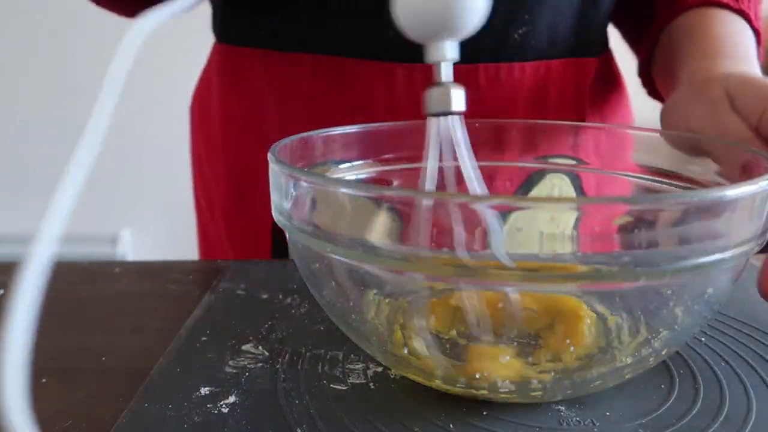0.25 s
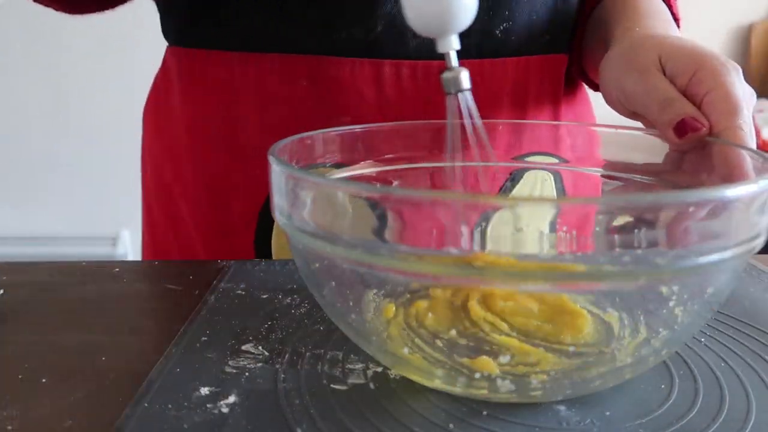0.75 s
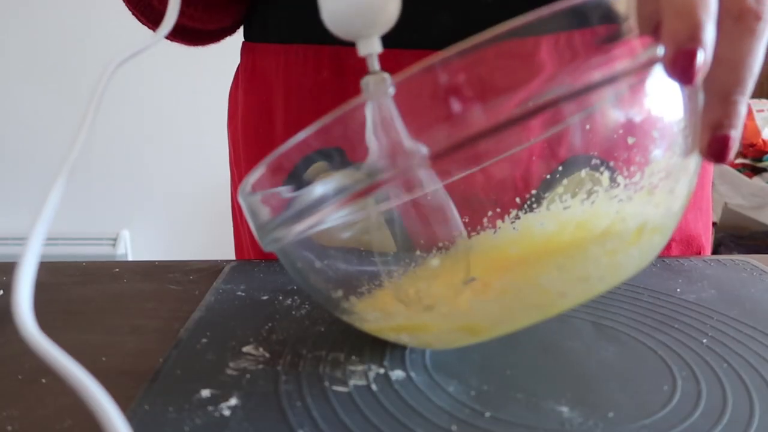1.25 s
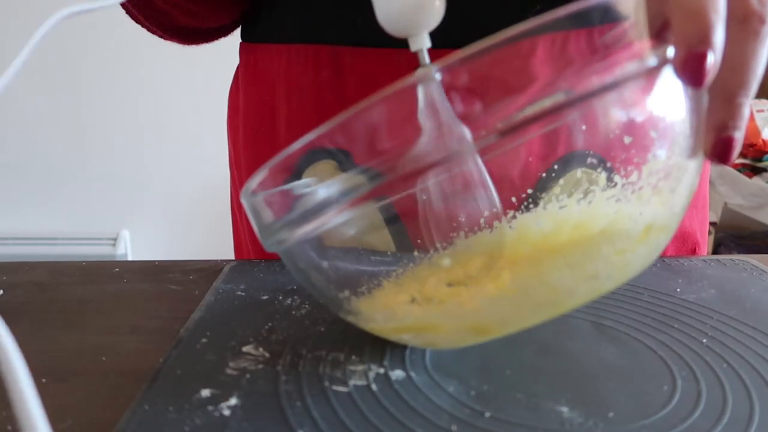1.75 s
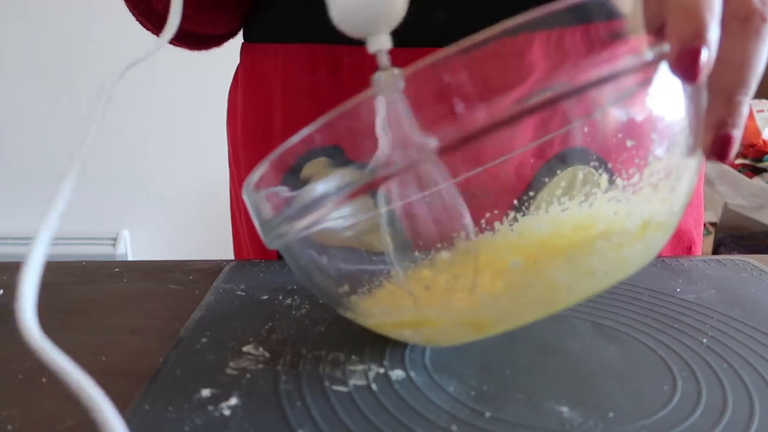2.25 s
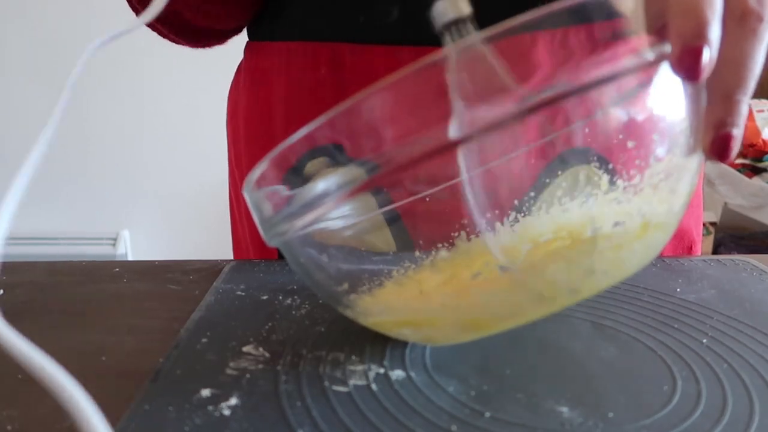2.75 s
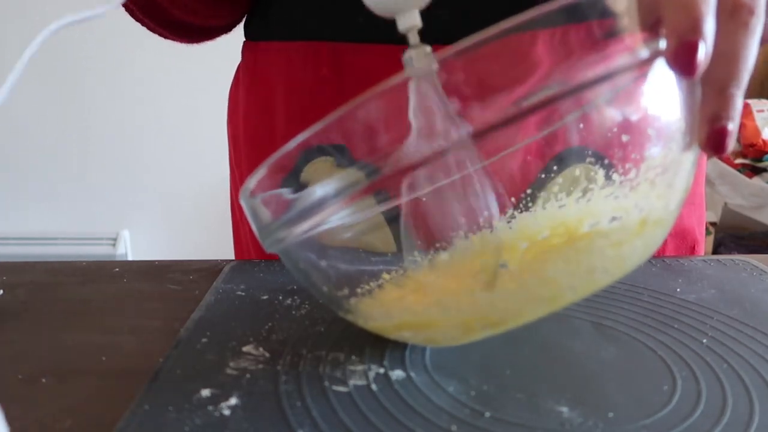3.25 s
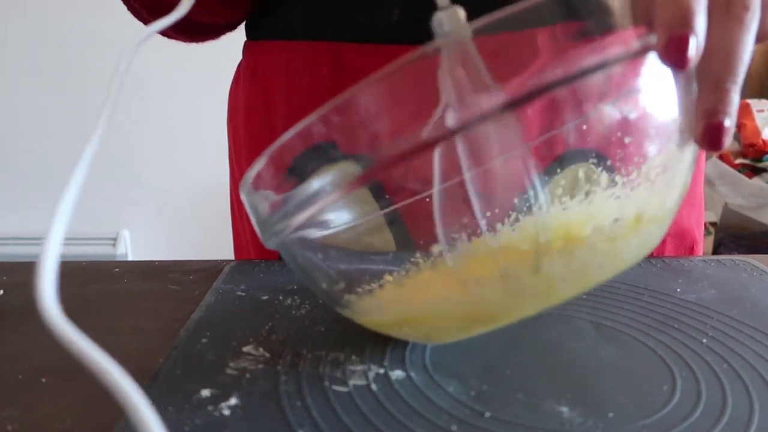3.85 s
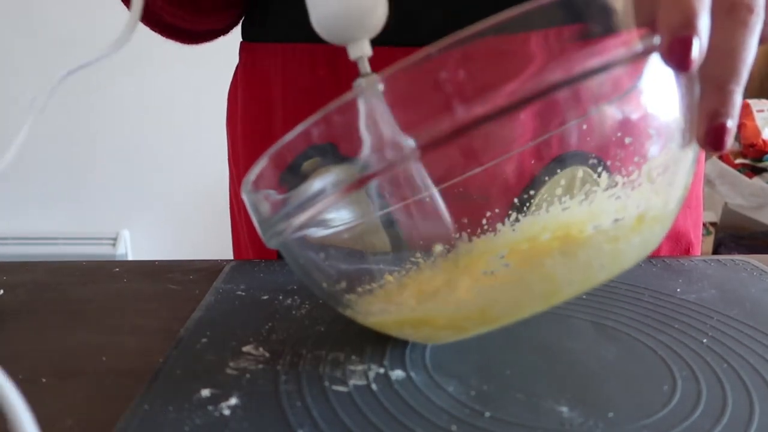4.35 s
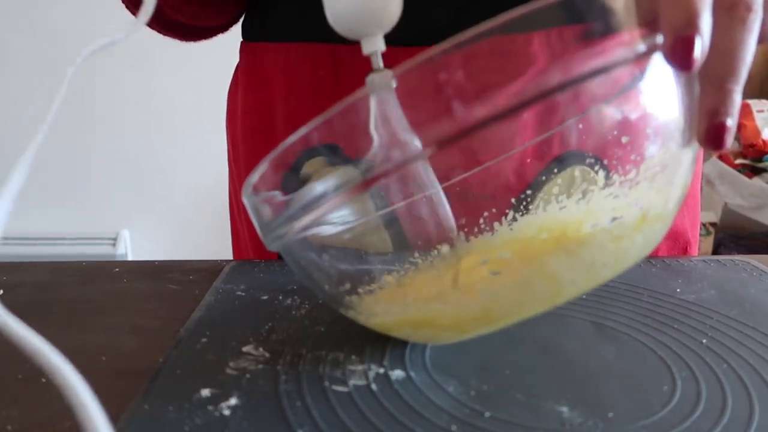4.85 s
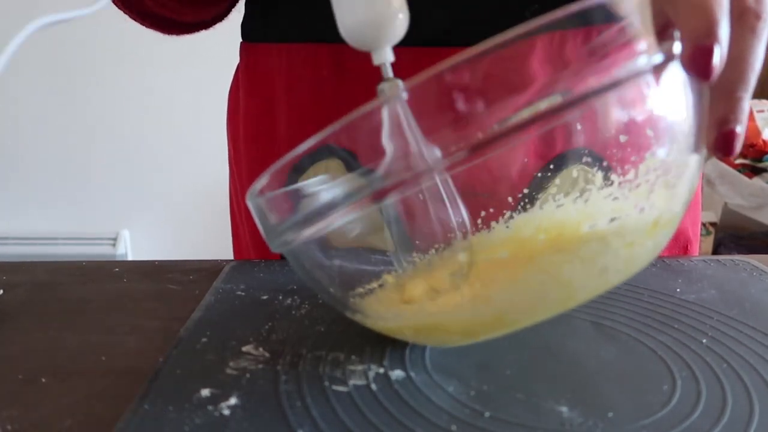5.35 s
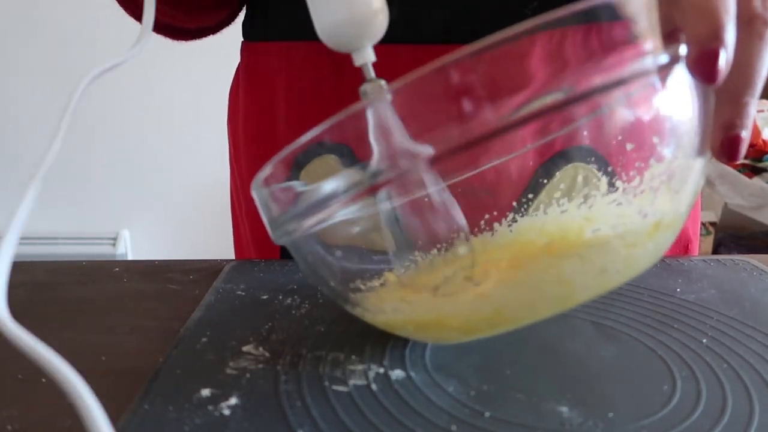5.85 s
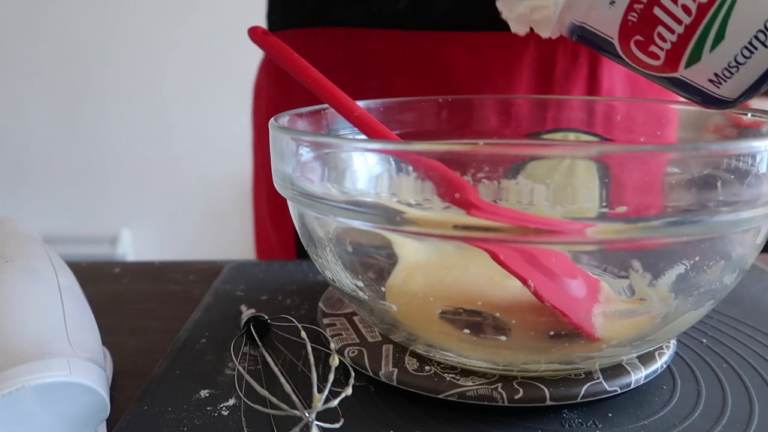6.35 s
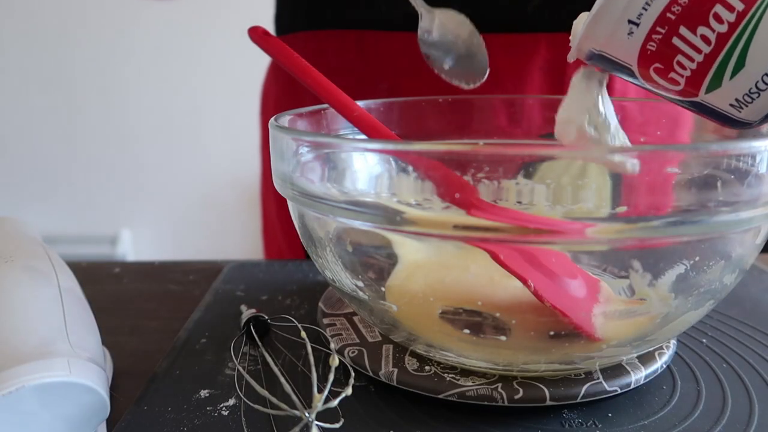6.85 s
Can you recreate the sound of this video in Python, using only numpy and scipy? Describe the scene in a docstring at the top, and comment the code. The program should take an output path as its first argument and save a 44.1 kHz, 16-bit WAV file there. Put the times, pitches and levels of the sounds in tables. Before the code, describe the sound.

Close in a kitchen, a whisk handled in a glass bowl gives light rustling, dull board knocks and one bright clink. A hard cut brings an electric whisk running continuously, wires buzzing and rattling fast on the glass over a thin gear whine, with sharp slaps and brief dips. It cuts off into quiet room air, low hum and a few tiny spoon ticks.

```python
"""A kitchen, heard close by a mid/side stereo microphone pair, in three joined moments.
A whisk is set into a glass bowl: rubbing contacts rustle, board modes thud, glass modes clink.
The electric whisk runs in the tilted bowl: gear and wire contacts drive housing, wires and bowl, over a
gear whine of sines and a low noise rumble. Then the quiet room is alone: coloured air, appliance hum
and a few small ticks of a spoon on a tub."""
import sys
import numpy as np
from scipy import signal
from scipy.fft import rfft, irfft
from scipy.io import wavfile
from scipy.ndimage import uniform_filter1d

SR = 44100
rng = np.random.default_rng(int(sys.argv[2]) if len(sys.argv) > 2 else 0)


def log_audio(samples):
    """Write samples as a 16-bit WAV file to the path given in sys.argv[1]."""
    # one column per channel
    frames = np.atleast_2d(samples).T
    # limit to full scale, then quantise
    limited = np.clip(frames, -1, 1)
    pcm = np.round(limited * 32767).astype(np.int16)
    wavfile.write(sys.argv[1], SR, pcm)


N = 313536
TIME_S = np.arange(N) / SR
START_S, STOP_S = .834, 5.991   # the whisk runs between these joins

# whine pitch of the gears: (time [s], pitch [Hz])
WHINE_PITCH = [(.83, 886), (1.5, 884), (2.6, 880), (3.2, 888), (4.4, 882), (5.2, 880), (5.6, 872), (6, 862)]
# slow changes of the running whisk, before lifts and flutter:
# (time [s], rattle level [dB], treble lift [dB], rumble level [dB])
WHISK_LEVELS = [(.84, -25.5, -2, -46), (.95, -26.5, -0.5, -44.5), (1.38, -26, -1.5, -44),
                (1.9, -27.5, -2, -48), (2.1, -26, -0.5, -45.5), (2.45, -27.5, -3.5, -45.5),
                (2.75, -27, 1, -45.5), (3.12, -27.5, -0.5, -42.5), (3.35, -25.5, 0.5, -47),
                (3.6, -30, 0.5, -47.5), (3.93, -28, 0, -42.5), (4.35, -25.5, -1.5, -48.5),
                (4.75, -27.5, -1.5, -46.5), (5.05, -24.5, -2, -45), (5.3, -26.5, -1, -46.5),
                (5.9, -25.5, -1.5, -47), (5.99, -28.5, -3.5, -55)]
LIFT_SMOOTH_S = 0.063   # treble and rumble follow the lifts smoothed over this time
LIFT_TREBLE, LIFT_RUMBLE = 0.48, 3.2   # treble gain and rumble loss, dB per dB of rattle loss


def whisk():
    """Motor rotation times the contacts, which drive the rattle, wires and bowl; returns mid and side."""
    phase = 2 * np.pi * np.cumsum(in_time(WHINE_PITCH)[0]) / SR
    rattle_db, treble_lift_db, rumble_db = in_time(WHISK_LEVELS)
    loss_db = lifted()
    eased_db = uniform_filter1d(loss_db, int(LIFT_SMOOTH_S * SR))
    contacts, crowding_db = gear_and_wire_contacts(phase)
    front = rattle(contacts, treble_lift_db + LIFT_TREBLE * eased_db)
    level = from_db(rattle_db - loss_db + 0.79 * drift(14.7))
    rings = bowl_rings(front, RING_CHATTER * crowding_db - loss_db)
    low_noise = rumble(contacts, rumble_db - LIFT_RUMBLE * eased_db)
    mid = level * (front + wire_song(contacts)) + slaps(front) + rings + whine(phase) + low_noise
    side = level * side_rattle(contacts) + from_db(-2) * band(rings, 2634, 2662)
    # 2 ms fades at the joins
    running = np.clip((TIME_S - START_S) / .002, 0, 1) * np.clip((STOP_S - TIME_S) / .002, 0, 1)
    return running * mid, running * side


TOOTH_DB, TOOTH_UNEVEN_DB = -19, 5   # tooth knocks against the other contacts, and their spread


def gear_and_wire_contacts(phase):
    """Contacts crowd once and twice a motor turn and once a whisk turn; one gear tooth knocks each motor turn."""
    motor, wires = phase / 4, phase / 22
    crowding_db = 2.5 * np.cos(motor) + 2.2 * np.cos(2 * motor)
    crowding_db += 1.9 * np.cos(wires + 1.5 * drift(1.5)) + .7 * drift(20)
    contacts = grains(5000 * from_db(crowding_db), spread_db=1.5)
    turns = np.diff(np.floor(motor / (2 * np.pi)), prepend=0)
    tooth = turns * from_db(rng.normal(0, TOOTH_UNEVEN_DB, N))
    return contacts + from_db(TOOTH_DB) * rms_one(tooth), crowding_db


# the wires ease off the glass, then bite again:
# (time of greatest loss [s], rattle loss [dB], easing [s], bite [s])
LIFTS = [(1.14, 2.5, 0.11, 0.0078), (1.3, 3.5, 0.069, 0.033), (1.407, 8.5, 0.011, 0.017),
         (1.926, 3.5, 0.021, 0.063), (2.0, 3, 0.011, 0.013), (2.0605, 8.5, 0.031, 0.0011),
         (2.259, 3, 0.059, 0.049), (2.425, 7, 0.018, 0.011), (2.859, 4, 0.038, 0.034),
         (2.975, 4, 0.036, 0.068), (3.25, 7.5, 0.025, 0.043), (4.022, 5, 0.044, 0.042),
         (4.15, 2, 0.053, .012), (4.355, 4.5, 0.02, 0.016), (4.64, 2.5, 0.011, 0.071),
         (4.85, 5, 0.026, 0.011), (5.01, 3.5, 0.066, 0.006), (5.326, 4, 0.018, 0.013)]


def lifted():
    """Loss in dB while the wires ease off the glass and bite again."""
    return sum(np.interp(TIME_S, [s - easing_s, s, s + bite_s], [0, loss_db, 0])
               for s, loss_db, easing_s, bite_s in LIFTS)


# resonances of the whisk housing: (pitch [Hz], width [Hz], level over the rattle [dB])
HOUSING = [(1216, 190, 4.5), (3220, 600, 6), (4650, 810, 8), (6100, 610, 4.5)]
# colour of the rattle in the mid microphone: (frequency [Hz], density [dB per Hz])
RATTLE_MID = [(350, -51.5), (600, -17), (678, -21.5), (706, -12.5), (866, -8), (953, -8), (1600, 2.5),
              (1860, 0.5), (2400, -0.5), (3710, -8), (4750, -9.5), (9630, -25.5), (11300, -53),
              (13000, -31.5), (15500, -43.5)]
# the rattle turns hollow around one pitch: (time [s], loss [dB], length [s])
HOLLOWS = [(4.8, 8, 0.078), (5.12, 14, 0.044), (5.452, 0.5, .15)]
HOLLOW_HZ, HOLLOW_WIDTH_HZ = 2630, 300


def rattle(contacts, treble_lift_db):
    """Contacts and reflections sound the housing, whose resonances swell and fade as the hand moves."""
    front = contacts + moving_reflect(contacts, t60=0.067, db=-8)
    front = front + sum((from_db(db + 1.05 * drift(0.74)) - 1) * resonate(front, hz, width)
                        for hz, width, db in HOUSING)
    front = colour(front, RATTLE_MID)
    front = front + (from_db(treble_lift_db) - 1) * band(front, 2450, 10800)
    hollow_db = sum(db * bell(s, length_s) for s, db, length_s in HOLLOWS)
    return front + (from_db(-hollow_db) - 1) * resonate(front, HOLLOW_HZ, HOLLOW_WIDTH_HZ)


# colour of the rattle in the side microphone: (frequency [Hz], density [dB per Hz])
RATTLE_SIDE = [(120, -59), (200, -45), (365, -12), (665, -15), (842, -24), (1150, -100), (1710, -5),
               (2700, 7.5), (3010, -1), (4330, 8), (11800, 1.5), (15500, -23)]


def side_rattle(contacts):
    """The side microphone gets moving reflections of the contacts mixed with noise."""
    reflected = moving_reflect(contacts, t60=0.15, db=0.0)
    return from_db(-15.0) * colour(reflected + .7 * rng.standard_normal(N), RATTLE_SIDE)


# whisk wires sing: (pitch [Hz], width [Hz], level against the rattle [dB])
WIRES = [(1110, 13, -24), (1225, 7.8, -27), (1304, 5.9, -42), (1522, 9.9, -27.5), (1640, 9.3, -26.5),
         (1770, 6.8, -36), (2220, 8.6, -39), (2410, 10, -29), (2900, 15, -30)]


def wire_song(contacts):
    """Contacts excite narrow wire resonances, each of wandering level."""
    return sum(from_db(db + 4.1 * drift(7.1)) * rms_one(resonate(contacts, hz, width))
               for hz, width, db in WIRES)


# the whisk passes the spots that sound each bowl mode, one list a mode: (time [s], level [dB], length [s])
RINGING = [
    [(.9, -37, 0.07), (1.17, -42, 0.083), (1.55, -39, 0.034), (2.15, -49, 0.085), (4.23, -38, 0.06),
     (4.8, -33.5, 0.051), (5.08, -37, 0.039), (5.6, -37, 0.11), (5.87, -30, 0.036)],
    [(1.0, -43, 0.26), (2.8, -37, 0.1), (3.1, -39, 0.17), (3.35, -38, 0.083), (3.61, -34, 0.062),
     (4.05, -35, 0.1), (4.5, -42, 0.15), (5.29, -35, 0.052)],
    [(1.1, -38, 0.097), (1.38, -40, .04), (1.75, -37, 0.054), (2.3, -41, 0.18), (3.02, -44, 0.06),
     (3.18, -31, 0.017), (3.35, -30, 0.033), (3.75, -37.5, 0.096), (4.23, -36, 0.075), (4.5, -33, 0.035),
     (5.29, -33, 0.048)],
    [(3.15, -32, 0.042), (3.43, -29, 0.022), (3.52, -27.5, 0.02), (3.74, -29.5, 0.048),
     (3.95, -32.5, 0.067)],
    [(.98, -45, 0.034), (4.45, -42, 0.15), (5.5, -45, 0.48)],
    [(2.85, -38, 0.11)],
    [(1.03, -37, 0.032), (2.8, -41, 0.03), (2.93, -47, 0.032), (5.28, -38, 0.053)],
]
# bowl modes while the whisk runs, in the order of the lists above: (pitch [Hz], width [Hz])
RUNNING_BOWL = [(1634, 340), (2167, 180), (2405, 120), (2630, 180), (3250, 540), (4110, 300), (1960, 150)]
RING_REST_DB = -59.5   # between passes
RING_CHATTER = 0.78   # share of the contacts' crowding heard in the rings


def bowl_rings(front, chatter_db):
    """The rattle drives each bowl mode, which swells when the whisk passes its spots."""
    return sum(swells(passes, RING_REST_DB) * from_db(chatter_db) * sustained(front, hz, width)
               for passes, (hz, width) in zip(RINGING, RUNNING_BOWL))


RING_EVENING, RING_SMOOTH_S = .35, .03   # how far the rings' flutter is evened out, and the smoothing time


def sustained(x, hz, width_hz):
    """A steep resonance whose flutter is partly evened out by its smoothed power; rms 1."""
    tone = rms_one(resonate(resonate(x, hz, width_hz), hz, 2 * width_hz))
    power = uniform_filter1d(tone ** 2, int(RING_SMOOTH_S * SR))
    return rms_one(tone / (np.abs(power) + .05) ** (RING_EVENING / 2))


# wires slap the glass: (time [s], level [dB])
STRIKES = [(0.8347, -11), (1.1006, -17), (1.412, -14), (1.7667, -15), (2.062, -20), (2.3, -21),
           (2.4313, -25), (2.631, -30), (2.872, -13), (2.933, -14), (2.988, -17), (3.1232, -25),
           (3.424, -22), (3.5174, -29), (3.7472, -20), (4.1566, -29), (4.4093, -14), (4.7154, -16),
           (4.8575, -15), (5.262, -20), (5.7587, -32)]
STRIKE_CLICK_DB = -3   # peak of the loudest click, against the highest level above
STRIKE_T60_S, STRIKE_LOSS_DB = 0.059, 20   # the chatter after a click, below its level above


def slaps(front):
    """Single hard contacts of wire on glass, each followed by a dying burst of rattle."""
    s, db = np.transpose(STRIKES)
    clicks = np.zeros(N)
    clicks[(s * SR).astype(int)] = from_db(db) * rng.choice([-1, 1], len(s))
    clicks = colour(clicks + reflect(clicks, t60=0.02, db=-11), RATTLE_MID)
    clicks = clicks * from_db(db.max() + STRIKE_CLICK_DB) / np.abs(clicks).max()
    chatter = sum(burst(s, db - STRIKE_LOSS_DB, STRIKE_T60_S) for s, db in STRIKES)
    return clicks + front * chatter


# gear whine at four times the motor speed: (time [s], level before flutter [dB])
WHINE = [(.86, -49), (1.3, -47), (2.3, -47.5), (3.22, -48), (3.78, -57), (3.92, -48), (4.53, -45),
         (4.98, -49), (5.06, -43), (5.97, -45.5)]
# tones locked to the whine: (multiple of the whine pitch, level before flutter [dB])
ORDERS = [(.0909, -60.5), (0.1464, -61), (0.4546, -62.5), (0.82, -62), (1.259, -52.5), (1.501, -59),
          (2, -48)]


def whine(phase):
    """Sines at the gear whine and multiples of it, wavering in level and phase."""
    level = from_db(in_time(WHINE)[0] + 2.8 * drift(6.3))
    tones = np.sqrt(2) * level * np.sin(phase + 0.81 * drift(6.7))
    for multiple, db in ORDERS:
        wander = 2.24 * drift(1.55)
        tones = tones + np.sqrt(2) * from_db(db + 4.1 * drift(4.7)) * np.sin(multiple * phase + wander)
    return tones


# colour of the rumble: (frequency [Hz], density [dB per Hz])
RUMBLE = [(12, -29), (20, -12.5), (75, 1.5), (134, -8.5), (156, -12.5), (236, -17.5), (267, -9), (431, -6),
          (473, 2), (675, -17), (800, 0), (1040, -26), (1760, -120)]
# the bass of the rumble surges: (time [s], level [dB], length [s])
SURGES = [(1.35, -52, .15), (3.12, -44, 0.039), (5.5, -49.5, 0.075)]


def rumble(contacts, rumble_db):
    """Low noise mixed with the contacts, with surges of bass noise."""
    steady = colour(rng.standard_normal(N) + 0.47 * contacts, RUMBLE)
    bass = rms_one(band(rng.standard_normal(N), 70, 148))
    return from_db(rumble_db + 1.7 * drift(8.7)) * steady + swells(SURGES, -90) * bass


# colour of the rustle: (frequency [Hz], density [dB per Hz])
RUSTLE_MID = [(410, -33), (700, -8), (807, 1.5), (861, -2), (1540, 4), (2800, 2), (3070, -0.5),
              (4640, -1.5), (5150, -9), (7800, -12), (15500, -33)]


def handling():
    """Rustle, dull knocks with a tick on top, and the glass ringing; returns mid and side."""
    rubbed = rustle()
    crack = colour(rng.standard_normal(N), RUSTLE_MID)
    knocks, glass = thuds(crack), clinks(crack)
    before = TIME_S < START_S
    mid = rubbed + knocks + glass + band(reflect(knocks, t60=.1, db=-8), 180, 5000)
    # the side treble comes from differences between neighbouring samples
    reflected = moving_reflect(rubbed + glass + knocks, t60=0.011, db=0.5)
    side = band(reflect(knocks, t60=0.082, db=-17), 180, 900) + signal.lfilter([1, -1], [1], reflected)
    return before * mid, before * side


# bowl knocks on the board:
# (time [s], level [dB], favoured pitch [Hz], tick level [dB], share of the free ring time)
THUDS = [(0.067, -49, 370, -40, 2.2), (0.22, -39, 320, -44, 1.6), (0.2668, -29, 420, -30, 0.6),
         (0.294, -41, 400, -60, .5), (.335, -40, 360, -50, 0.55), (0.3489, -32, 420, -29.5, 1.6),
         (0.388, -40, 800, -43, 0.55), (.534, -41, 500, -36, .5), (.579, -32, 383, -28.5, 2),
         (0.737, -30, 130, -45, 0.44), (0.75, -23, 350, -28.5, 0.35), (0.768, -33.5, 200, -47, 1.1),
         (0.79, -27.5, 550, -38, 0.66), (0.8, -36, 170, -44, 0.77)]
# modes of the board: (pitch [Hz], level against the knock [dB], free ring time T60 [s])
BOARD = [(101, -3, 0.093), (158, 0.5, 0.099), (260, -4, 0.074), (375, 2, 0.045), (539, -2.5, 0.027),
         (740, -2, 0.039)]
FOCUS_DB = 8.5   # loss of a mode one octave off the favoured pitch
ROCK_S, ROCK_LOSS_DB = .012, 4   # three more touches fall within this time, each weaker by this loss
DETUNE = 0.13   # whole span of the grip's mode shifts, as a share of the pitch
BOARD_LAG_S, BOARD_CUT_HZ = 0.00081, 68   # the board answers late and radiates little deep bass
SNAP_HZ, SNAP_DB, SNAP_T60_S = 1970, 3, 0.0028   # the sharp front of a tick, against the tick


def thuds(crack):
    """Each knock is four quick touches that push or pull every board mode anew, with a tick on top."""
    board, ticks = np.zeros((2, N))
    chances = rng.random((len(THUDS), 5, 1 + len(BOARD)))
    for (s, db, pitch_hz, tick_db, share), (shifts, *touches) in zip(THUDS, chances):
        for k, (late, *pushes) in enumerate(touches):
            touch_s = s + BOARD_LAG_S + ROCK_S * late * (k > 0)
            for (hz, mode_db, t60), push, shift in zip(BOARD, pushes, shifts):
                gain_db = db + mode_db - ROCK_LOSS_DB * k - FOCUS_DB * np.log2(hz / pitch_hz) ** 2
                # the first touch always pushes; later ones go either way
                strength = 2 * push - 1 if k else .5 + push
                mode_hz = hz * (1 + DETUNE * (shift - .5))
                board += strength * ring(touch_s, gain_db, mode_hz, share * t60)
        ticks += crack * burst(s, tick_db, 0.011) + ring(s, tick_db + SNAP_DB, SNAP_HZ, SNAP_T60_S)
    return band(board, BOARD_CUT_HZ, 5000) + ticks


# wire on glass: (time [s], level [dB])
CLINKS = [(0.495, -29.5), (0.791, -44)]
# free modes of the glass bowl: (pitch [Hz], level against the clink [dB], ring time T60 [s])
BOWL = [(932, -12, 6.1), (1680, -7, 0.51), (2591, -6, 1.3), (2594, -11.5, 0.82), (3670, -3, 0.16),
        (4951, -5, 0.16), (6372, -8, 0.12), (6950, -16, 0.37), (6700, -13, 0.22), (8650, -22, 0.31)]
GRIP_S, GRIP_LOSS_DB = 0.68, 2   # a hand lands on the rim and damps the glass


def clinks(crack):
    """A wire blow sets the glass modes ringing under a short noisy crack."""
    glass = sum(ring(s, db + mode_db, hz, t60) for s, db in CLINKS for hz, mode_db, t60 in BOWL)
    glass = glass * from_db(np.interp(TIME_S, [GRIP_S, GRIP_S + .02], [0, -GRIP_LOSS_DB]))
    return glass + sum(crack * burst(s, db - 0.5, 0.018) for s, db in CLINKS)


# whisk and bowl are rubbed: (time [s], level near 6 kHz [dB], length [s])
RUSTLE = [(.078, -61.5, 0.019), (.22, -66, 0.028), (.36, -62.5, 0.029), (.5, -60, 0.0047),
          (.56, -67, 0.048), (.77, -69, 0.027)]
RUSTLE_REST_DB = -66   # between rubs


def rustle():
    """Rubbing is a fluctuating crowd of small contacts with moving reflections."""
    rub = grains(1200 * from_db(6 * drift(22)), spread_db=0.5)
    noise = colour(rub + moving_reflect(rub, t60=0.038, db=5), RUSTLE_MID)
    return swells(RUSTLE, RUSTLE_REST_DB) * noise / np.std(band(noise, 5200, 6200))


# room level, before the trims of its parts: (time [s], level [dB])
ROOM_DB = [(0, -44.5), (.83, -41.5), (.84, -74), (5.985, -74), (5.995, -40.5), (7.11, -40.5)]
# colour of the air in the first moment: (frequency [Hz], density [dB per Hz])
EARLY_AIR = [(18, -34), (30, -10), (110, -1.5), (200, -10.5), (370, -5), (493, -10), (830, -23),
             (1500, -23.5), (8000, -30.5), (15500, -55)]
# colour of the air after it, mid microphone: (frequency [Hz], density [dB per Hz])
ROOM_MID = [(12, -50), (20, -17), (49, -10), (153, -8), (342, -9), (491, -11.5), (631, -19), (725, -18.5),
            (1230, -22), (1340, -21.5), (8170, -47), (11100, -50.5), (15500, -61)]
# colour of the air, side microphone: (frequency [Hz], density [dB per Hz])
ROOM_SIDE = [(24, -50), (40, -38), (179, -8), (438, -6), (2160, -18), (2390, -15), (2770, -18), (3650, -18),
             (15500, -36)]


def room():
    """Coloured noise for air, appliance hum after the first moment, and small ticks; returns mid and side."""
    level = from_db(in_time(ROOM_DB)[0])
    early, white = TIME_S < START_S, rng.standard_normal(N)
    air = np.where(early, colour(white, EARLY_AIR), colour(white, ROOM_MID)) * from_db(.8 * drift(8.9))
    mid = level * (from_db(-4.5) * air + ~early * appliance_hum()) + spoon_ticks()
    return mid, level * from_db(-17.5) * colour(rng.standard_normal(N), ROOM_SIDE)


# appliance hum: (pitch [Hz], width [Hz], level against the room level [dB])
HUM = [(97, 6, -16), (152.7, 11, -10), (245, 11, -13)]
HUM_TONE_HZ, HUM_TONE_DB = 635, -17.5   # its one tone, level before flutter against the room level


def appliance_hum():
    """Narrow bands of noise and one slightly wavering sine."""
    hum = sum(from_db(db) * rms_one(resonate(rng.standard_normal(N), hz, width)) for hz, width, db in HUM)
    tone = np.sin(2 * np.pi * HUM_TONE_HZ * TIME_S + 0.47 * drift(4.4))
    return hum + np.sqrt(2) * from_db(HUM_TONE_DB + drift(3.0)) * tone


# spoon on the tub: (time [s], level [dB], pitch [Hz])
TICKS = [(6.898, -43, 1600), (7.076, -46, 2400), (7.091, -47, 2400)]


def spoon_ticks():
    """Each tick is resonant noise shaped by a dying 75 Hz swing."""
    crack = rng.standard_normal(N)
    return sum(rms_one(resonate(resonate(crack, hz, 880), hz, 640)) * ring(s, db, 75, 0.14)
               for s, db, hz in TICKS)


def from_db(db):
    """Decibels to gain."""
    return 10 ** (np.asarray(db) / 20)


def rms_one(x):
    """Scale to unit power."""
    return x / np.sqrt(np.mean(x ** 2) + 1e-20)


def in_time(rows):
    """Columns of a curve table, one value a sample."""
    s, *columns = np.transpose(rows)
    return [np.interp(TIME_S, s, c) for c in columns]


def colour(x, spectrum):
    """Causal (minimum phase) filter with the given dB per Hz; rms 1."""
    size = 8192
    hz, db = np.transpose(spectrum)
    grid = np.maximum(np.arange(size // 2 + 1) * SR / size, 1)
    cepstrum = irfft(np.log(from_db(np.interp(np.log(grid), np.log(hz), db))))
    # folding the cepstrum forward in time makes the phase minimal
    cepstrum[1:size // 2] *= 2
    cepstrum[size // 2 + 1:] = 0
    response = irfft(np.exp(rfft(cepstrum)))
    return rms_one(signal.fftconvolve(x, response)[:N])


def drift(rate):
    """Slow chance of spread 1, made at every 40th sample."""
    r = np.exp(-80 * np.pi * rate / SR)
    slow = signal.lfilter([1], [1, -2 * r, r * r], rng.standard_normal(N // 40 + 2002))[2000:]
    return np.interp(np.arange(N) / 40, np.arange(len(slow)), rms_one(slow))


def resonate(x, hz, width_hz):
    """A two-pole resonance of gain 1 on top."""
    r = np.exp(-np.pi * width_hz / SR)
    poles = [1, -2 * r * np.cos(2 * np.pi * hz / SR), r * r]
    return signal.lfilter(np.array([1, 0, -1]) * (1 - r * r) / 2, poles, x)


def ring(s, db, hz, t60):
    """One blow sets one mode ringing as a dying sine."""
    out, start = np.zeros(N), int(s * SR) + 1
    t = np.arange(start, min(N, start + int(2 * t60 * SR))) / SR - s
    out[start:start + len(t)] = from_db(db - 60 * t / t60) * np.sin(2 * np.pi * hz * t)
    return out


def burst(s, db, t60):
    """A sudden start that dies away; returns gain."""
    t = TIME_S - s
    return (t >= 0) * from_db(db - 60 * np.abs(t) / t60)


def bell(s, length_s):
    """A bell-shaped rise to 1 at the given time."""
    return np.exp(-.5 * ((TIME_S - s) / length_s) ** 2)


def swells(rows, rest_db):
    """Bell-shaped rises added to a resting level; returns gain."""
    return from_db(rest_db) + sum(from_db(db) * bell(s, length_s) for s, db, length_s in rows)


def reflect(x, t60, db):
    """Dense early reflections from bowl, board and walls, as dying noise."""
    t = np.arange(int(t60 * SR)) / SR
    echoes = rms_one(rng.standard_normal(len(t))) * from_db(-60 * t / t60) / np.sqrt(t60 * SR / 14)
    return from_db(db) * signal.fftconvolve(x, echoes)[:N]


def moving_reflect(x, t60, db):
    """The source moves, so four reflection patterns fade into each other at even power."""
    shares = np.array([drift(12.5) for path in range(4)])
    shares /= np.sqrt(np.sum(shares ** 2, axis=0))
    return sum(share * reflect(x, t60, db) for share in shares)


def grains(per_s, spread_db):
    """Random contacts of uneven size; rms 1."""
    sizes = from_db(spread_db * np.minimum(rng.exponential(1, N), 5)) * rng.choice([-1, 1], N)
    return rms_one(sizes * (rng.random(N) < per_s / SR))


def band(x, low_hz, high_hz):
    """Gentle band-pass."""
    return signal.sosfilt(signal.butter(2, [low_hz, high_hz], "band", fs=SR, output="sos"), x)


def scene():
    """Mid and side of all sources, turned into left and right."""
    mid, side = np.sum([whisk(), handling(), room()], axis=0)
    return np.array([mid + side, mid - side])


def record(dry):
    """A steep low-pass cuts the top, 70 dB down from about 16 kHz."""
    return signal.sosfilt(signal.cheby2(12, 70, 15550 * 1.03, fs=SR, output="sos"), dry)


dry = scene()
out = record(dry)
log_audio(out)
```